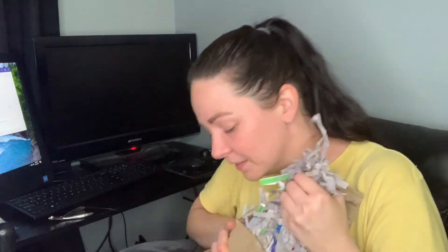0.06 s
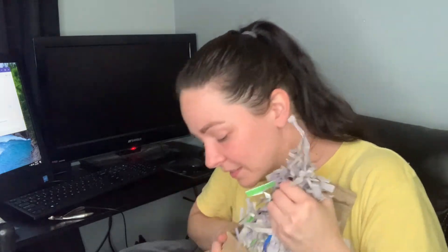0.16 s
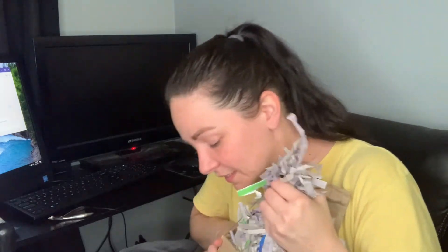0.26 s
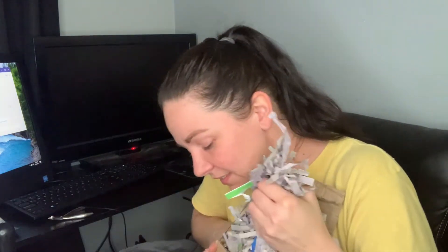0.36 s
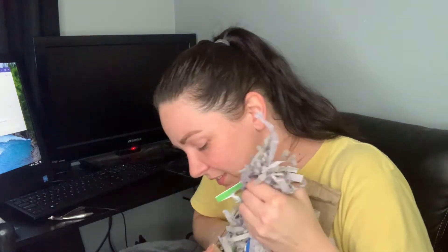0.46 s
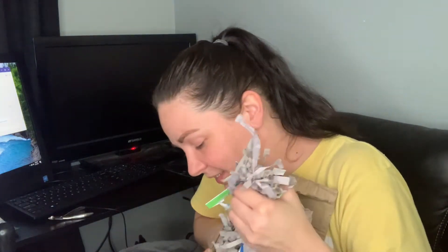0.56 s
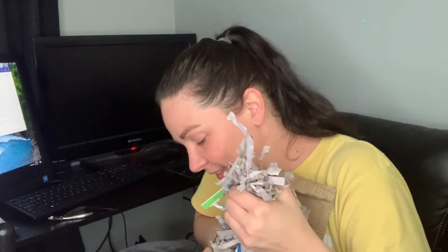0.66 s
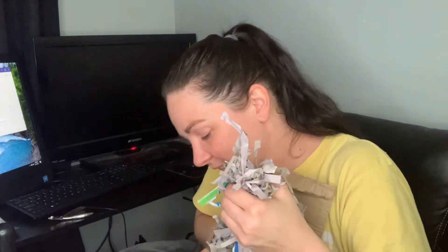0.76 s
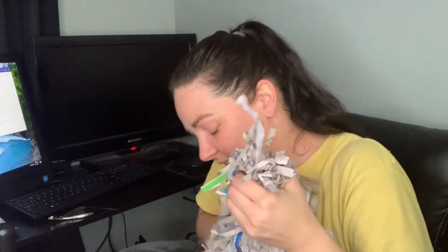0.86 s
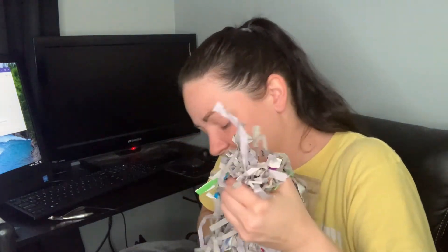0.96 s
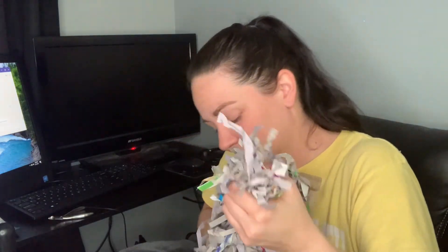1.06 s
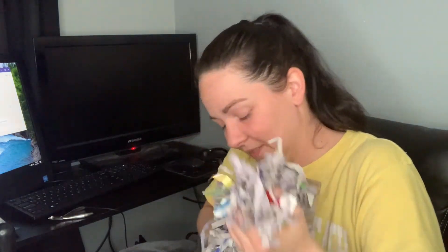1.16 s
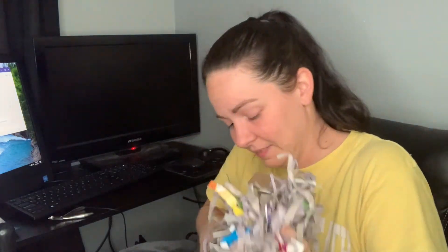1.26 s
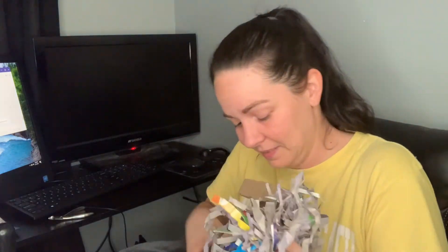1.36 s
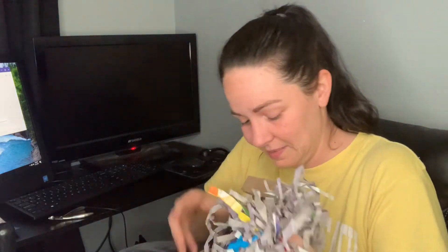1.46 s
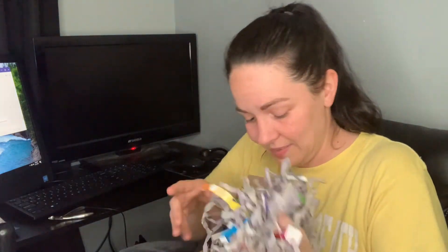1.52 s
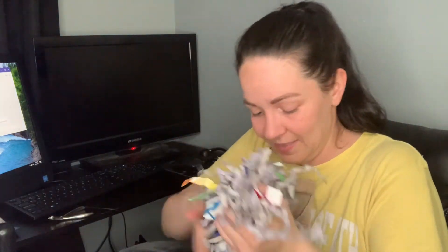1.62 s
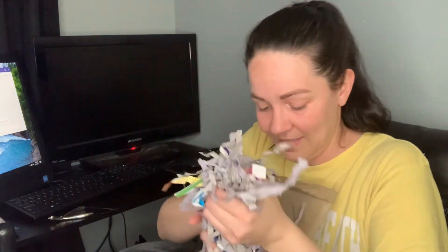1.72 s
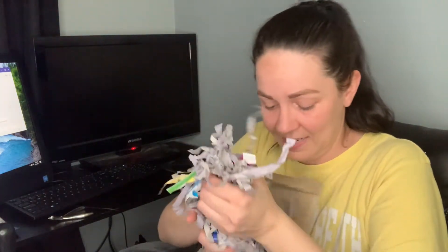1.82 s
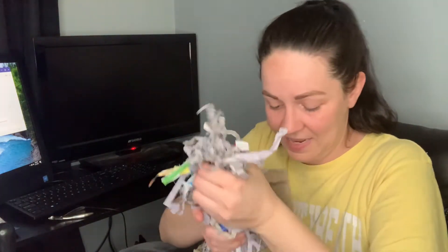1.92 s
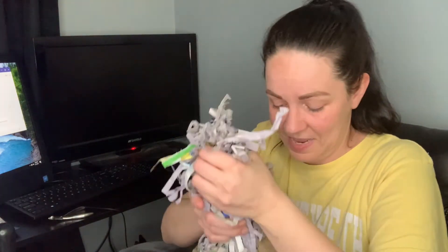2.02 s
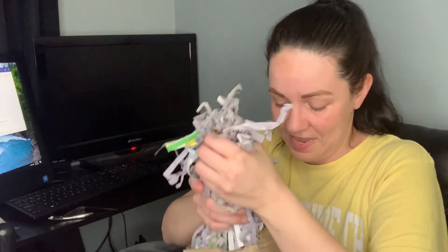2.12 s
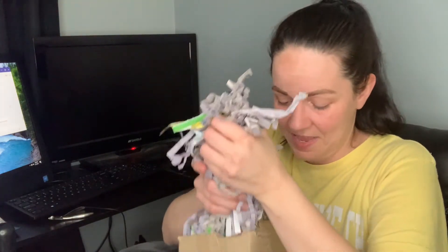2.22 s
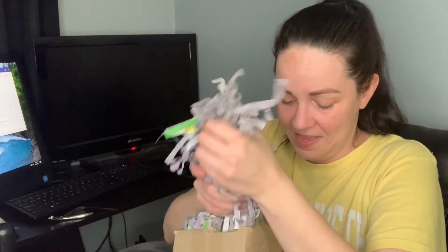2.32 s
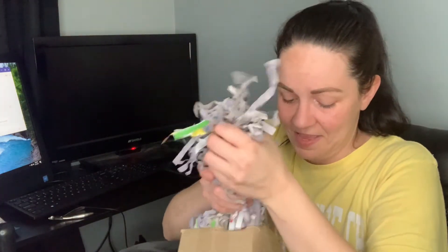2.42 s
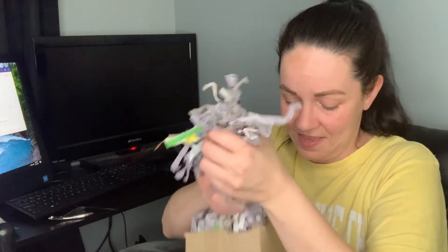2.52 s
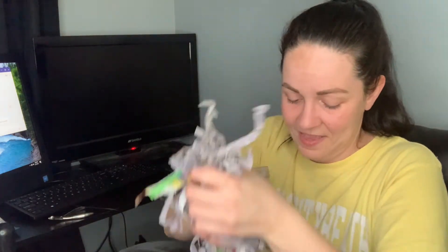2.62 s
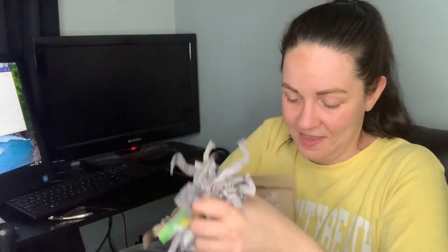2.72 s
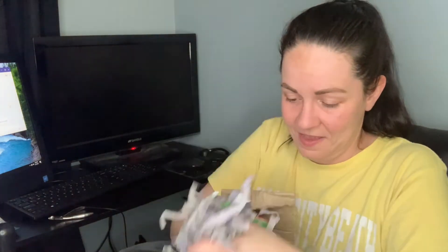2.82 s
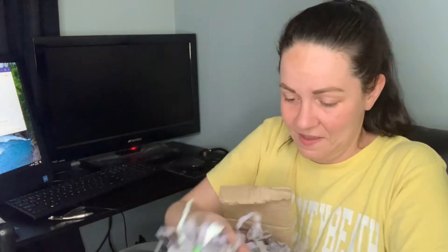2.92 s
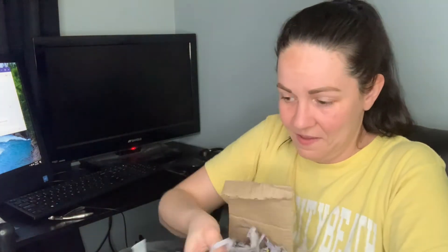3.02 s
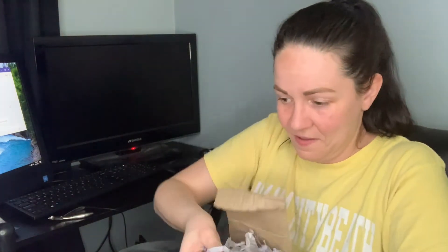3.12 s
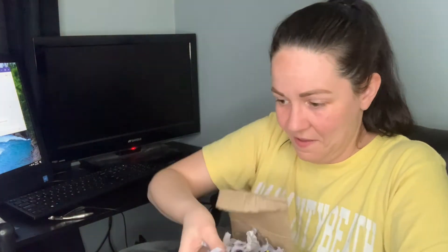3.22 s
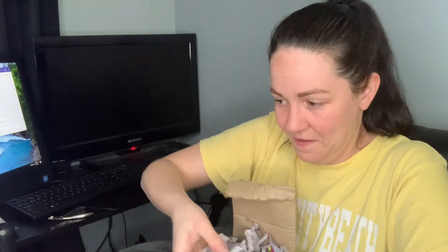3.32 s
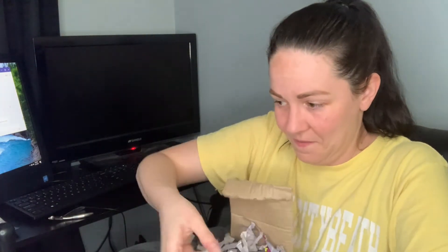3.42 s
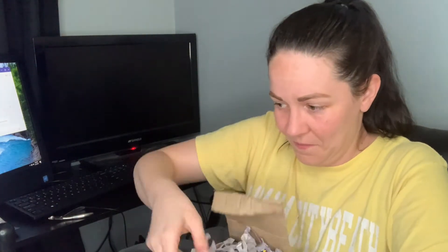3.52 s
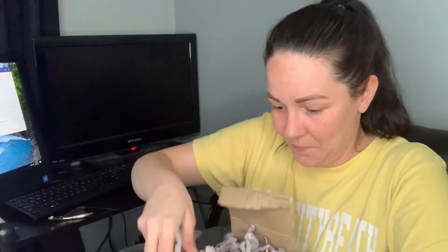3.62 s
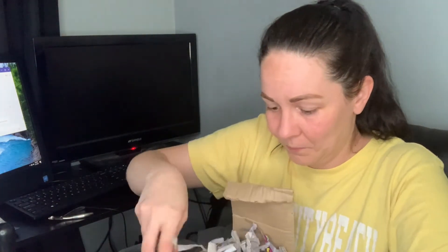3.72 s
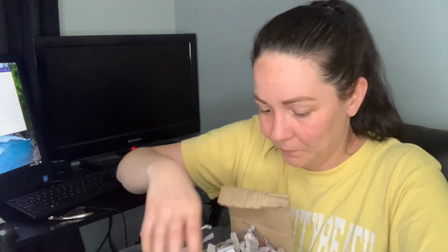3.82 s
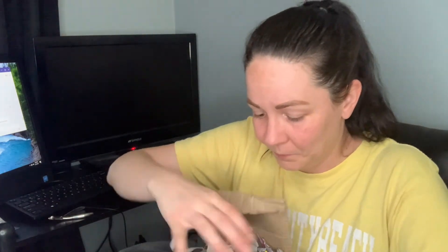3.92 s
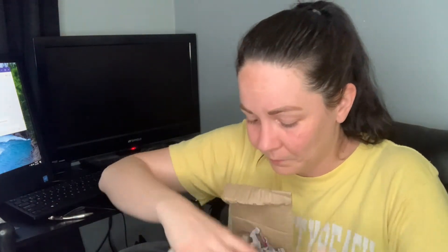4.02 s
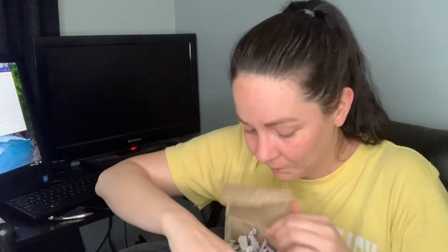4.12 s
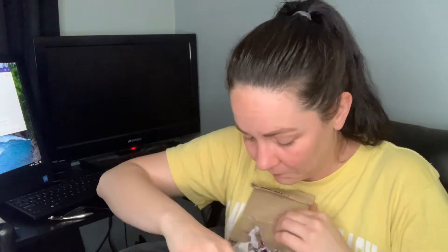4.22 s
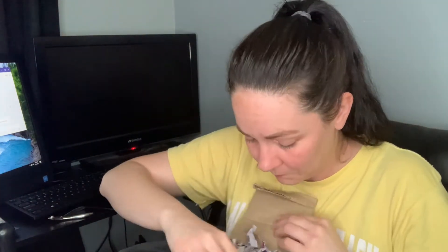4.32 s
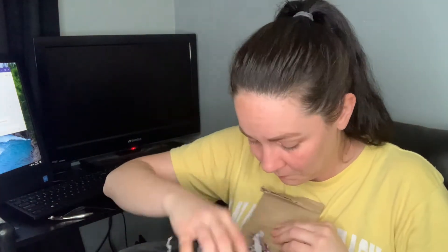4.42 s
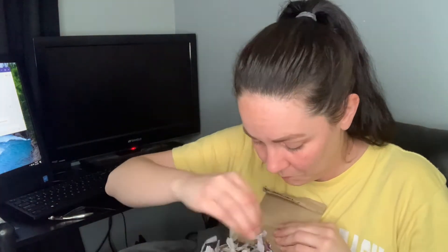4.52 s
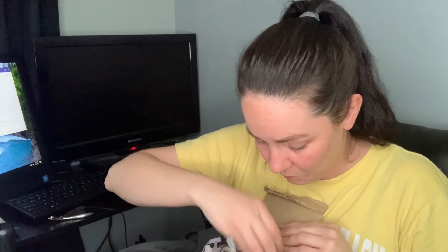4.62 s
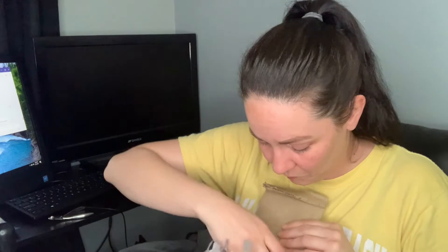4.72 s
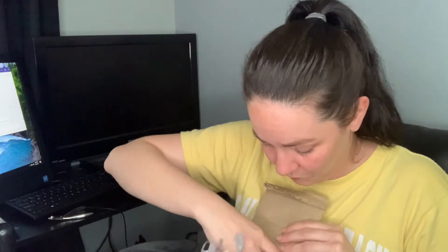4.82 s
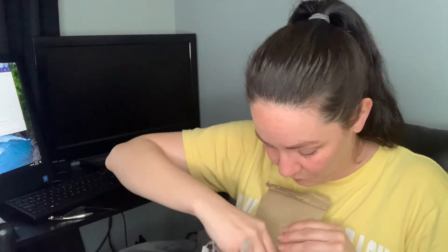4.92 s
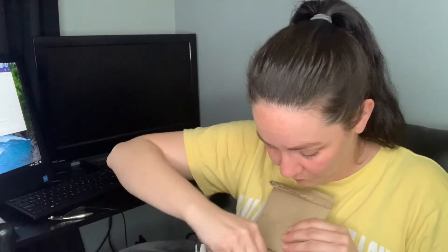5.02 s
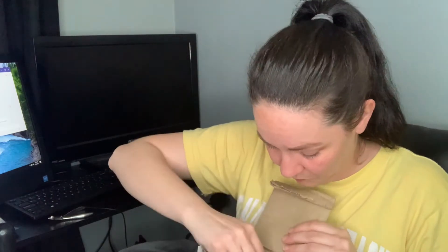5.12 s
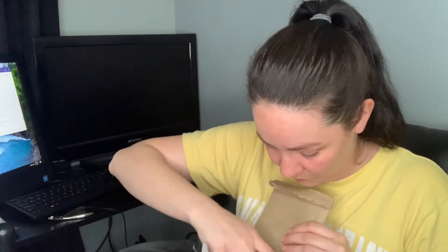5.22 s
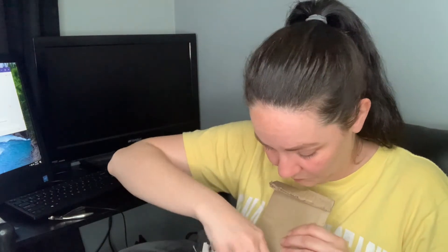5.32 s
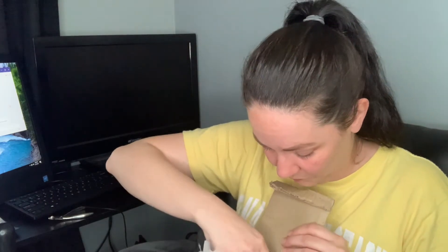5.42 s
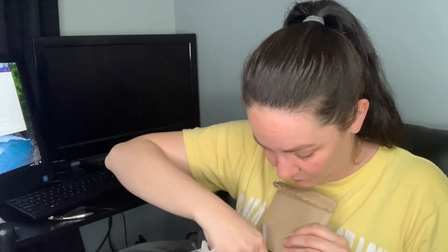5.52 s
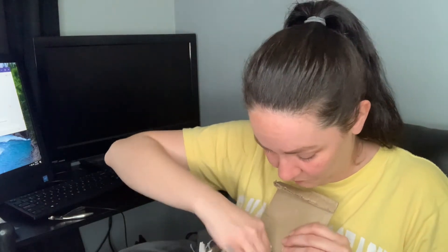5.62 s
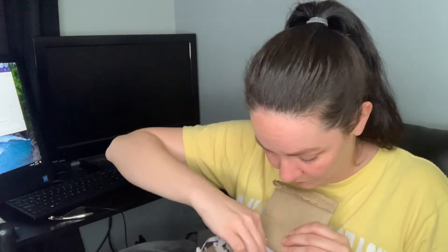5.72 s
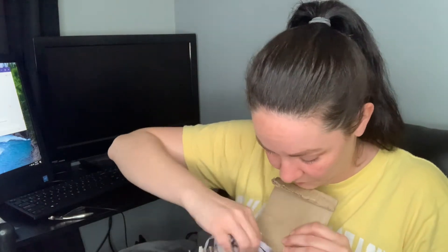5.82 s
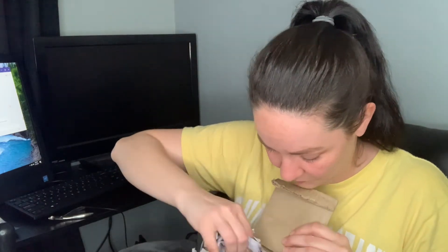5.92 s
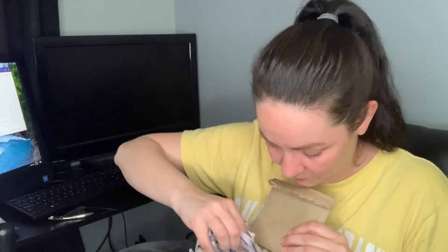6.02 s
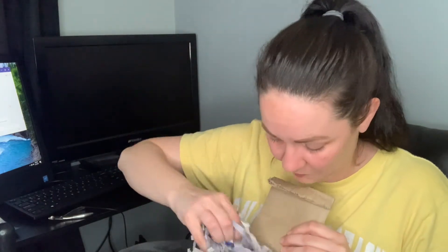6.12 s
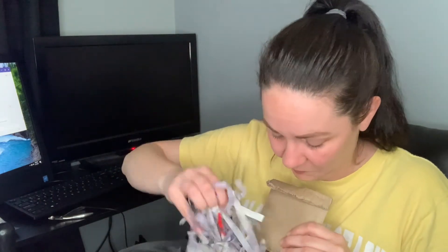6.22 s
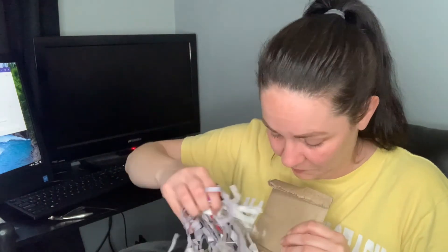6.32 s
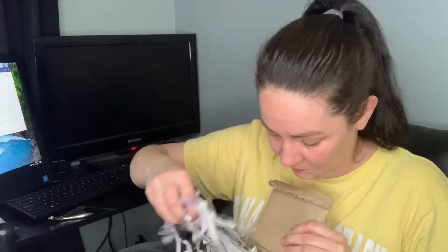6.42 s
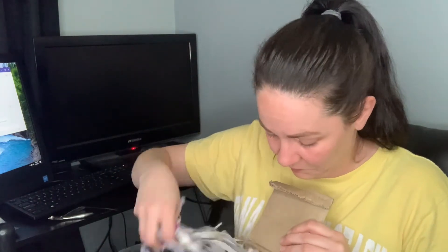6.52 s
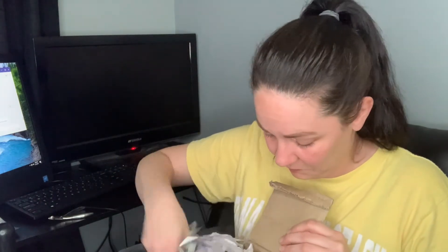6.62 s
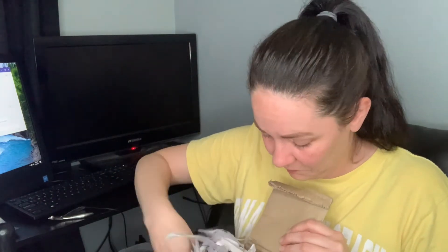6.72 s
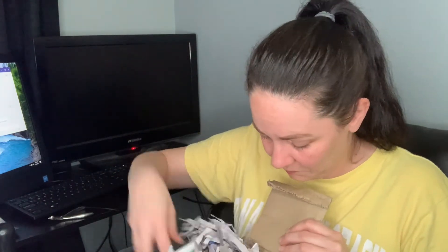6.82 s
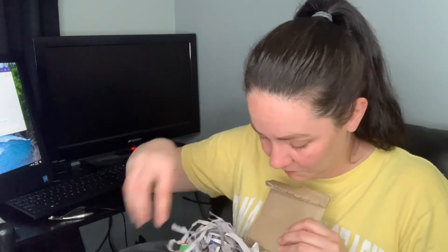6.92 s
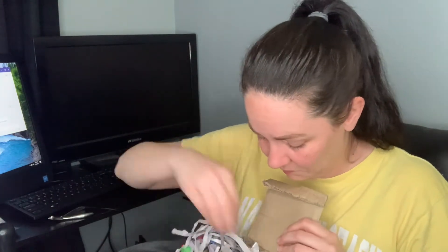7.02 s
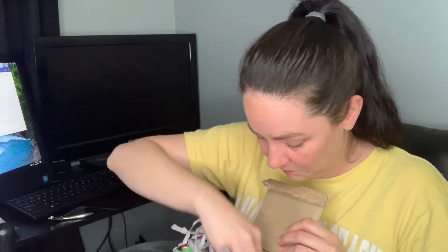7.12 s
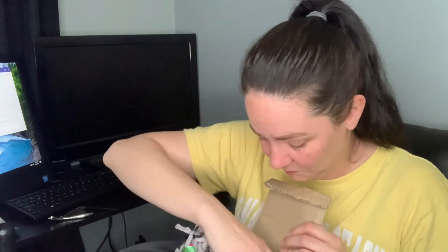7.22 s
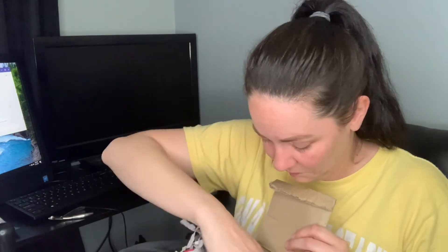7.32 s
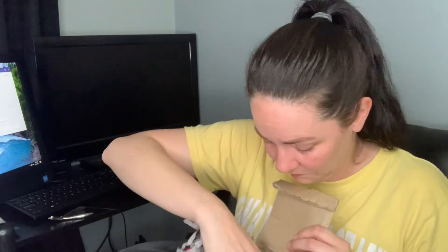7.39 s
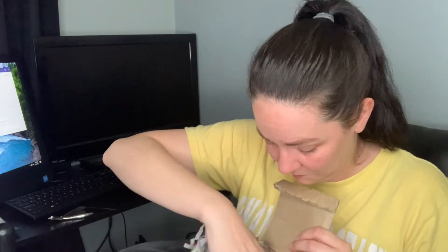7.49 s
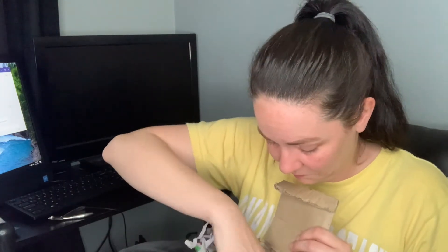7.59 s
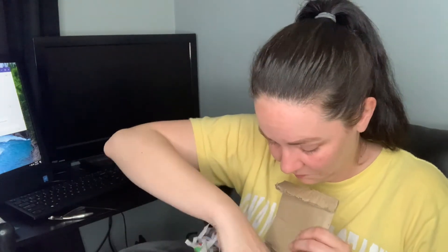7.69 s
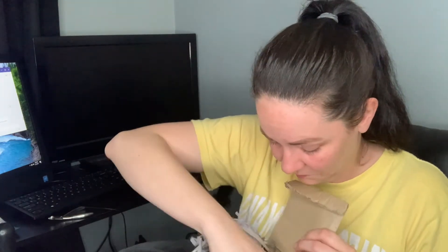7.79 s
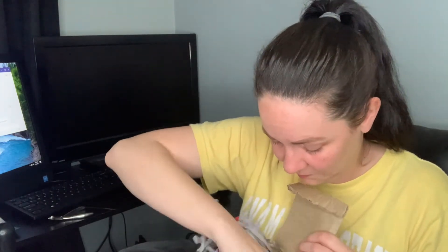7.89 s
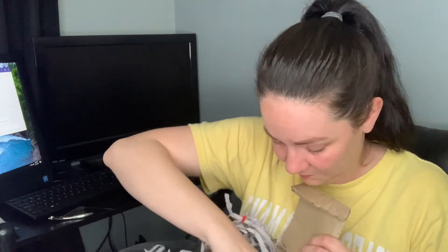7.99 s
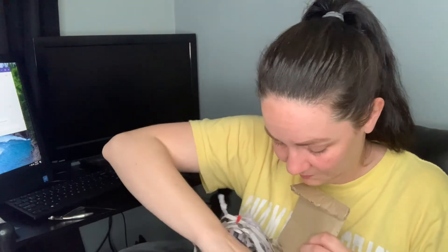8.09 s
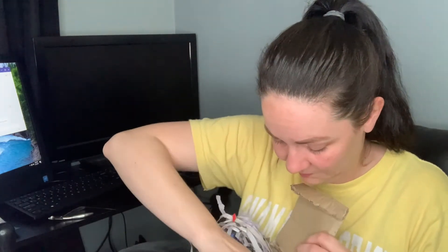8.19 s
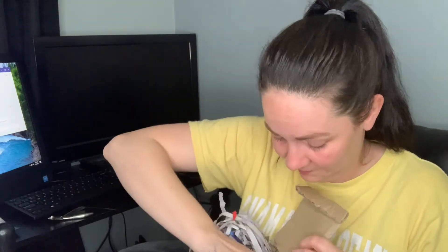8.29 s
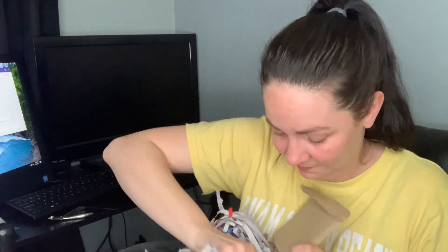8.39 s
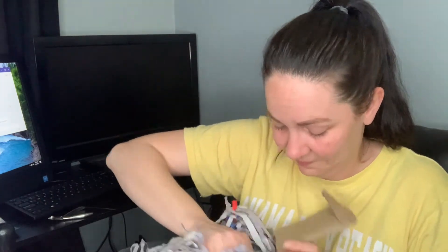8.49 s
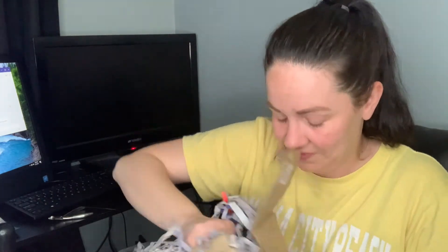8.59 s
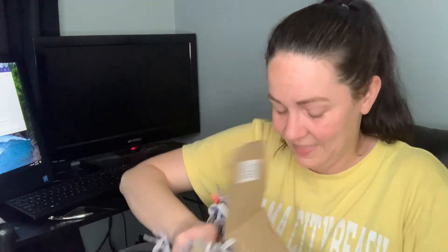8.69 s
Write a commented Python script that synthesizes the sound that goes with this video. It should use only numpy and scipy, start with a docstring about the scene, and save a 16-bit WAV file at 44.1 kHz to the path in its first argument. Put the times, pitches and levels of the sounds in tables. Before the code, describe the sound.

Hands dig through crisp shredded paper in a small cardboard box, with bright rustling, stiff paper crinkles, sharp snaps and dull box thuds indoors.

```python
"""Hands dig through shredded paper in a cardboard box, near a two-port microphone in a furnished room.
Strips hiss and tick from the start; the sharpest crease snaps near 0.48 s, the strongest stroke is near 0.81 s.
Strokes and box thuds go on to a lull near 3.8 s; a thud and kraft crinkles follow at 4.1 s, a dip near 4.5 s.
Crinkles crowd at 5.2-5.5 s, strong strokes come at 6-6.2 s, a hard thud near 7.4 s, then snaps to 8.5 s.
Friction is slips over shaped noise; snaps and crinkles are kicked resonances; thuds are decaying wall modes."""
import sys
import numpy as np
from scipy import signal
from scipy.fft import rfft, irfft, next_fast_len
from scipy.io import wavfile
from scipy.ndimage import uniform_filter1d, map_coordinates

SR = 44100
rng = np.random.default_rng(int(sys.argv[2]) if len(sys.argv) > 2 else 0)


def store_wav(level_fs):
    """Save 16-bit WAV to argv[1]."""
    pcm = np.round(np.clip(np.atleast_2d(level_fs), -1, 1) * 32767)
    wavfile.write(sys.argv[1], SR, pcm.T.astype(np.int16))


N = 385875


def amp(db):
    """Amplitude factor of a level in dB."""
    return 10 ** (np.asarray(db) / 20)


def unit(x):
    """x scaled to an RMS of 1 in each row."""
    return x / np.sqrt(np.mean(x ** 2, -1, keepdims=True) + 1e-20)


def along(points, hz):
    """Interpolate (Hz, value) points on a log frequency axis."""
    point_hz, value = np.transpose(points)
    return np.interp(np.log(hz + 1), np.log(point_hz + 1), value)


def curves(rows):
    """One value per sample for each column after the time."""
    time_s, *columns = np.transpose(rows)
    return [np.interp(np.arange(N) / SR, time_s, column) for column in columns]


def wobble(knots_per_s):
    """A smooth random curve."""
    knots = rng.standard_normal(int(N * knots_per_s / SR) + 4)
    return map_coordinates(knots, [np.arange(N) * knots_per_s / SR])


def filtered(x, response):
    """x times a complex response of frequency."""
    size = next_fast_len(N + SR // 2)
    spectrum = rfft(x, size) * response(np.fft.rfftfreq(size, 1 / SR))
    return irfft(spectrum, size)[..., :N]


def resonances(peaks, hz):
    """Sum of (centre Hz, width Hz, dB) resonances of alternating sign."""
    total = 0
    for k, (centre, width, db) in enumerate(peaks):
        damping = 1j * hz * width
        total = total + (-1) ** k * amp(db) * damping / (centre ** 2 - hz ** 2 + damping)
    return total


# Room air noise colour. Each row: frequency in Hz, level in relative dB.
AIR_COLOUR = [(20, -23), (60, 3.5), (300, -2.5), (700, -32), (3000, -43), (15500, -28)]


def air():
    """Steady noise with most of its level in the lows, independent in the two rows."""
    noise = rng.standard_normal((2, N))
    return amp(-70.5) * unit(filtered(noise, lambda hz: amp(along(AIR_COLOUR, hz))))


# Room decay. Each row: frequency in Hz, t60 in s.
ROOM_T60 = [(150, 0.37), (1500, 0.35), (12000, 0.16)]


def room(hits):
    """Convolve with a noise tail in which each frequency dies at its own speed."""
    hz, t, z = signal.stft(rng.standard_normal((2, SR // 2)), SR, nperseg=256)
    decay = amp(-60 * t / along(ROOM_T60, hz)[:, None])
    tail = signal.istft(z * decay, SR, nperseg=256)[1]
    tail = tail / np.linalg.norm(tail[0])
    delayed = np.pad(hits, (130, 0))[None]  # samples
    return signal.fftconvolve(delayed, tail, axes=1)[:, :N]


# Port phase. Each row: frequency in Hz, lead of left over right in radians.
PORT_LEAD = [(0, 0), (600, -.9), (1200, -.9), (2600, -2.1), (3400, -1.9), (4400, -3.3), (6200, -4.8),
             (8300, -3.2), (9600, -3.1), (13200, -.05), (14800, .05), (15700, .8)]
# Stereo likeness of left and right by frequency. Each row: frequency in Hz, likeness (no unit).
STEREO_LIKENESS = [(60, .8), (300, .8), (700, .2), (1400, .7), (2000, .55), (3600, .28), (5000, .55),
                   (7300, .65), (8300, .98), (9600, .98), (10400, .85), (12400, .84), (13400, .98),
                   (14700, .98), (15800, .7)]
# Port balance. Each row: frequency in Hz, left minus right in dB.
PORT_BALANCE = [(60, -1), (150, 0), (380, 0.5), (950, -3.5), (2380, -1.5), (5980, -1), (15000, 0.5)]


def ports(pair):
    """The direct row reaches both ports with a phase offset; the scattered row differs in sign between them."""
    def mix(hz):
        turn = np.arccos(np.clip(along(STEREO_LIKENESS, hz), 0, 1)) / 2
        return np.array([np.cos(turn), np.sin(turn)])

    def offset(hz):
        side = np.array([[.5], [-.5]])  # left, right
        phase = side * np.interp(hz, *np.transpose(PORT_LEAD))
        return amp(side * along(PORT_BALANCE, hz)) * np.exp(1j * phase)

    direct, scattered = filtered(pair, mix)
    return filtered(np.array([direct + scattered, direct - scattered]), offset)


# Blows on the box.
# Each row: start in s, wall drive in relative dB, most driven pitch in Hz, deep drive in relative dB.
THUDS = [(0, -40, 294, -43.5), (0.203, -27.5, 434, -73), (0.248, -41, 269, -42), (0.751, -36, 357, -76),
         (0.795, -33, 444, -69), (1.063, -29.5, 370, -53), (1.289, -37, 356, -51), (1.56, -37, 310, -64),
         (1.629, -26.5, 287, -47), (2.156, -33.5, 454, -75.5), (2.353, -35.5, 420, -76.5),
         (2.561, -39, 285, -39.5), (2.694, -32.5, 380, -44), (2.62, -42.5, 250, -46.5),
         (2.743, -34, 266, -55), (3.783, -44, 298, -68), (3.866, -51, 237, -53.5), (3.916, -44, 202, -52),
         (4.097, -24, 274, -42.5), (4.64, -28.5, 320, -47), (4.941, -47, 372, -69), (5.136, -34, 211, -61),
         (5.186, -30, 285, -56), (5.488, -43, 212, -60.5), (6.65, -32, 254, -38.5), (7.036, -36, 290, -70),
         (7.094, -33, 315, -55), (7.365, -21.5, 340, -43.5), (7.694, -35, 295, -65), (8.452, -35, 408, -82)]
# Modes of the box walls. Each row: frequency in Hz, level in relative dB, t60 in s.
BOX_MODES = [(50.6, -5, 0.18), (63.7, -4.5, 0.28), (88.7, 0, 0.15), (103.5, -2, 0.14), (134, 3, 0.14),
             (169.3, -1, 0.17), (206, 1.5, 0.054), (255, 1, 0.064), (298.6, 5, 0.051), (375, 2.5, 0.055),
             (436, 5.5, 0.082), (490, 0, 0.058), (578, 7.5, 0.053)]


def thuds():
    """A soft blow rings wall modes near its own pitch, and the deep modes in which the whole box rocks."""
    out, t = np.zeros(N + SR), np.arange(SR // 2)[:, None] / SR
    hz, mode_db, t60_s = np.transpose(BOX_MODES)
    rise = 1 - np.exp(-t * hz / 1.1)  # builds up over about one cycle
    for start_s, wall_db, centre_hz, deep_db in THUDS:
        wall_reach = amp(wall_db - 11 - 35.0 * np.log2(hz / centre_hz) ** 2)
        deep_reach = amp(deep_db + 3.5 - 2.47 * np.log2(hz / 90) ** 2)
        scatter_db = rng.normal(0, 3.25, len(hz))
        strength = (wall_reach + deep_reach) * amp(mode_db + scatter_db - 60 * t / t60_s)
        ring = strength * rise * np.sin(2 * np.pi * (hz * t + rng.random(len(hz))))
        out[round((start_s + .004) * SR):][:len(t)] += ring.sum(1)
    return out[:N]


def buckles(events, width, rattle, order=2):
    """Each fold lets go at once: a kick and a dying rattle through a steep, broad resonance of the sheet."""
    out, t = np.zeros(N + SR), np.arange(4096) / SR
    f = np.fft.rfftfreq(len(t), 1 / SR)
    for start_s, peak_db, hz, t60_s in events:
        burst = rattle * amp(-60 * t / max(t60_s, .002)) * rng.standard_normal(len(t))
        burst[0] += 1  # kick
        sheet = resonances([(hz, width * hz, 0)], f) ** order
        ring = irfft(rfft(burst) * sheet)
        out[round((start_s + .0007) * SR):][:len(t)] += amp(peak_db) * ring / np.abs(ring).max()
    return out[:N]


# Kraft paper buckling. Each row: start in s, fold peak in dB, fold centre in Hz, rattle t60 in s,
# crack peak in dB.
CRINKLES = [(0.093, -44, 1300, .03, -44), (0.2487, -44, 1300, 0.027, -23.5),
            (0.291, -30.5, 1120, 0.031, -31), (0.4777, -21.5, 1820, 0.015, -19),
            (0.699, -37.5, 1450, .04, -35), (0.798, -36, 2200, 0.027, -33), (1.071, -33.5, 1340, .035, -37),
            (1.159, -33, 1630, 0.042, -40.5), (1.626, -37, 865, 0.031, -36), (2.163, -37, 1390, 0.057, -41),
            (2.562, -40, 1300, 0.063, -35), (2.695, -36.5, 960, 0.1, -32), (2.98, -29, 2000, 0.013, -36),
            (3.867, -49, 1500, .03, -41), (3.917, -45, 2380, .035, -38), (4.097, -27, 1400, 0.054, -21),
            (4.1, -23, 574, 0.042, -33), (4.599, -59, 1500, .03, -46), (4.646, -23.5, 1190, 0.042, -23),
            (4.678, -39, 1490, 0.018, -37), (4.739, -35, 1300, 0.17, -41), (4.852, -37, 1294, .06, -49),
            (4.941, -23.5, 1400, 0.0084, -40), (5.0053, -25, 1970, 0.011, -23),
            (5.196, -32, 1100, 0.05, -43.5), (5.205, -24.5, 1060, 0.021, -43),
            (5.212, -31.5, 840, 0.044, -46), (5.232, -42, 1300, 0.033, -46), (5.29, -33, 1000, 0.25, -50),
            (5.31, -28.5, 1420, 0.054, -37), (5.324, -31, 1300, 0.049, -36), (5.339, -31, 1420, 0.04, -44),
            (5.355, -38, 1500, .04, -46), (5.391, -37, 1180, 0.12, -47), (5.47, -39, 1500, 0.043, -46),
            (5.4938, -30.5, 1380, 0.02, -44), (5.51, -44, 1450, .06, -48), (5.9547, -39.5, 1100, 0.03, -37),
            (6.221, -30, 1150, 0.034, -36.5), (6.276, -28, 910, 0.022, -25),
            (7.043, -29.5, 2460, 0.073, -30), (7.098, -28.5, 1240, 0.089, -40),
            (7.105, -21.5, 944, 0.041, -31), (7.3619, -19, 1260, 0.016, -20), (7.513, -41, 2500, .015, -42),
            (7.671, -42, 1200, .04, -42), (7.696, -37.5, 1000, 0.13, -42), (8.347, -41, 1300, 0.028, -34),
            (8.455, -35.5, 1070, 0.036, -43)]


def folds():
    """The body of each crinkle: a kraft fold buckles at its own pitch."""
    events = [(s, peak_db, hz, t60_s) for s, peak_db, hz, t60_s, _ in CRINKLES]
    return buckles(events, width=0.93, rattle=0.3, order=3)


def cracks():
    """The crack of each crinkle: a short burst through a very wide resonance."""
    events = [(s, crack_db, 2400, .018) for s, _, _, _, crack_db in CRINKLES]
    return buckles(events, width=4.0, rattle=1.0)


# Creases snapping in the strips. Each row: start in s, peak in dB, centre in Hz, rattle t60 in s.
SNAPS = [(0.224, -27, 12500, .006), (0.3431, -24, 12700, .006), (0.4774, -3.5, 6000, .003),
         (0.4784, -21, 10800, .004), (0.699, -26, 12000, .015), (1.416, -40, 12500, .015),
         (1.8795, -23, 12800, .008), (2.1635, -29, 13000, .008), (3.9151, -32, 9500, .03),
         (4.0962, -19, 12580, .03), (4.4675, -44, 11000, .015), (4.5284, -43, 6800, .03),
         (4.5985, -36, 11000, .012), (5.006, -12.5, 11500, .006), (5.4985, -26, 12720, .008),
         (5.9524, -29, 9000, .02), (6.1695, -14, 11500, .008), (7.0415, -36, 4850, .03),
         (7.363, -24, 11000, .04), (7.61, -31, 10000, .02), (7.772, -29, 10000, .008),
         (7.8942, -21, 12000, .008), (7.948, -20, 11000, .006), (8.481, -19, 12000, .008)]


def snaps():
    """Single creases let go as short, mostly bright resonant bursts."""
    return buckles(SNAPS, width=0.94, rattle=0.56, order=3)


def friction(response, per_s, spread_db, clump_db, hiss, patchy_db):
    """Tiny slips of random size over sliding hiss; row 0 direct, row 1 scattered by the heap."""
    slips = rng.random((2, N)) < per_s / SR
    size_db = spread_db * np.minimum(rng.exponential(size=(2, N)), 3.2)
    sizes = amp(size_db) * rng.standard_normal((2, N))
    rub = np.sqrt(1 - hiss) * unit(slips * sizes) + np.sqrt(hiss) * rng.standard_normal((2, N))
    # different strips take turns: patches of gain in time and frequency
    z = signal.stft(rub * amp(clump_db * wobble(40)), nperseg=512)[2]
    field = uniform_filter1d(rng.standard_normal(z.shape[1:]), size=6, axis=0)
    field = uniform_filter1d(field, size=4, axis=1)
    rub = signal.istft(z * amp(patchy_db * field / field.std()), nperseg=512)[1][:, :N]
    return unit(filtered(rub, response))


# Box wall colour. Each row: frequency in Hz, level in relative dB per Hz.
WALL_COLOUR = [(20, -41), (45, -4.5), (100, -5.5), (300, 1.5), (450, 3), (700, -7), (1500, -11.5)]


def wall_scrape(level_db):
    """Sparse slips and hiss rub the box walls, which ring in their modes."""
    # width in Hz of a mode from its t60
    modes = [(hz, np.log(1000) / np.pi / t60_s, db) for hz, db, t60_s in BOX_MODES]

    def tone(hz):
        return amp(along(WALL_COLOUR, hz)) * (1 + 1.03 * np.abs(resonances(modes, hz)))

    return amp(level_db) * friction(tone, per_s=250, spread_db=1.0, clump_db=-1.84, hiss=0.8, patchy_db=3.0)


# Kraft paper colour. Each row: frequency in Hz, level in relative dB per Hz.
KRAFT_COLOUR = [(300, -50), (600, 0.5), (850, -2.5), (1400, 1.5), (2000, -7), (3500, -16.5), (7000, -13)]
# Modes of the hollow kraft bag. Each row: frequency in Hz, width in Hz, level in relative dB.
BAG_MODES = [(828, 11, 3), (1135, 120, -3.5), (1540, 20, 3.5), (2077, 25, 10)]


def kraft_rub(level_db):
    """Slips and hiss rub the kraft bag, which rings in its hollow modes."""
    def tone(hz):
        return amp(along(KRAFT_COLOUR, hz)) * (1 + 0.79 * np.abs(resonances(BAG_MODES, hz)))

    return amp(level_db) * friction(tone, per_s=900, spread_db=2.5, clump_db=1.97, hiss=0.61, patchy_db=1.5)


# Strip colour. Each row: frequency in Hz, level in relative dB per Hz.
STRIP_COLOUR = [(800, -56), (1800, -1), (2600, -1.5), (3900, -1.5), (4800, 1), (6200, -6.5), (9000, -14),
                (15500, -9)]


def strip_rustle(level_db):
    """Dense slips and hiss of strips sliding over each other, strongest in the mid band."""
    def tone(hz):
        return amp(along(STRIP_COLOUR, hz))

    return amp(level_db) * friction(tone, per_s=2500, spread_db=1.0, clump_db=1.5, hiss=0.57, patchy_db=2.5)


# Cut edge colour. Each row: frequency in Hz, level in relative dB per Hz.
EDGE_COLOUR = [(3000, -66), (5500, -5), (7500, 0.5), (10000, 1.5), (14500, -2.5), (15900, -2.5)]


def edge_tone(hz):
    """Bright response of the cut edges."""
    return amp(along(EDGE_COLOUR, hz))


def edge_fizz(level_db):
    """Very dense slips and hiss of the cut edges make a fine fizz."""
    rub = friction(edge_tone, per_s=5000, spread_db=-0.5, clump_db=1.5, hiss=0.43, patchy_db=3.0)
    return amp(level_db) * rub


def strip_ticks(level_db):
    """Single strips flick free: sparse slips without hiss."""
    rub = friction(edge_tone, per_s=120, spread_db=1.2, clump_db=1.5, hiss=0, patchy_db=3.0)
    return amp(level_db) * rub


# Strokes of the hands.
# Each row: peak time in s, level in dB, nominal time in s to rise 10 dB, nominal time in s to fall 10 dB.
STROKES = [(.13, -48.5, .1, 0.33), (.25, -48, 0.12, 0.23), (.48, -45, 0.38, 0.063),
           (0.586, -42.5, 0.03, 0.07), (.66, -49, 0.15, .015), (.703, -45, .004, .03),
           (0.812, -34, 0.06, 0.0559), (.9, -46.5, .02, 0.31), (1.262, -42, 0.22, 0.06),
           (1.44, -61.5, .03, 0.8), (1.53, -52.5, 0.04, 0.27), (1.65, -42.5, .07, 0.07),
           (1.8, -42.5, 0.07, 0.12), (2.05, -47, 0.26, 0.29), (2.18, -49, .02, 0.2),
           (2.33, -43.5, 0.02, 0.11), (2.581, -40.5, 0.05, 0.04), (2.7, -41, 0.08, 0.05),
           (2.95, -42, 0.2, 0.12), (3.219, -40.5, 0.05, 0.26), (3.45, -45, 0.1, 0.08), (3.7, -54, 0.3, 0.2),
           (3.872, -57, .006, .12), (3.922, -51, 0.006, 0.07), (4.012, -47, 0.035, 0.14),
           (4.11, -45.5, 0.02, 0.18), (4.21, -47.5, 0.04, 0.09), (4.33, -48, 0.1, 0.082),
           (4.535, -67, .05, .045), (4.602, -55, .005, .05), (4.642, -42, 0.022, 0.35),
           (4.96, -38, 0.0264, 0.08), (5.205, -45.5, 0.079, 0.06), (5.33, -48, 0.12, 0.45),
           (5.82, -46.5, 0.15, 0.1), (6.001, -40.5, 0.03, 0.07), (6.12, -39, 0.0243, 0.0847),
           (6.171, -34.5, 0.045, 0.0757), (6.37, -44, 0.24, 0.01), (6.58, -42.5, 0.31, 0.18),
           (6.9, -57.5, 0.6, 1), (7.11, -50.5, 0.02, 0.15), (7.2, -44, 0.08, 0.09), (7.38, -51, 0.14, 0.13),
           (7.6, -52.5, .3, 0.27), (7.76, -46.5, 0.09, 0.07), (7.93, -47, .1, 0.06),
           (8.02, -49, 0.07, 0.25), (8.34, -46, 0.16, 0.13), (8.415, -50, .01, .03),
           (8.46, -42, 0.02, 0.06), (8.58, -53, 0.4, 1), (8.75, -47, 0.13, 0.089)]
ROUND_DB = 2  # depth over which a stroke's top is rounded
SETTLE_DB = 14  # further under the peak the slope doubles


def strokes():
    """Digging level in dB: each stroke swells to its peak and dies away; overlapping strokes add in power."""
    t = np.arange(0, N, step=32) / SR
    peak_s, level_db, rise_s, fall_s = np.transpose(STROKES)[:, :, None]
    down_db = 10 * np.where(t < peak_s, (peak_s - t) / rise_s, (t - peak_s) / fall_s)
    down_db = np.hypot(down_db, ROUND_DB) - ROUND_DB
    down_db = down_db + np.maximum(down_db - SETTLE_DB, 0)
    power = amp(2 * (level_db - down_db)).sum(0)
    tremble_db = 0.94 * wobble(22)  # the grip trembles a little
    return np.interp(np.arange(N) / SR, t, 10 * np.log10(power)) + tremble_db


# Levels relative to the strokes as the hands move about the box.
# Each row: time in s, kraft bag in dB, box walls in dB, mid-band rustle in dB before a trim.
CONTACT = [(0, 0, 10.5, -19), (.15, -2.5, -6.5, -1), (.6, -5, -8, 1.5), (1.2, -2.5, -7, 1),
           (2, -5, -8.5, 0.5), (2.9, -5, -10, 0.5), (3.5, -4, -10.5, 1.5), (3.65, -11, -19, -4),
           (3.83, -3, -2, -0.5), (3.95, -7, -10, -1.5), (4.3, -6.5, -13, -1.5), (4.8, -4, -7.5, -1),
           (5.1, -5.5, -10, 0.5), (5.4, -1.5, -6.5, -2), (5.6, 0, -8, 0.5), (6.05, -3, -10, -4),
           (6.5, -10.5, -10.5, 0.5), (7, -2, -7.5, 1), (7.3, -2, -3.5, -1.5), (8, -2, -6.5, 0),
           (8.75, -9, -9.5, -2.5)]


def digging():
    """Strips, bag and walls rub as the hands move; in harder digging the fizz grows faster than the rustle."""
    stroke_db = strokes()
    kraft_db, walls_db, mid_db = curves(CONTACT)
    rustle_db = stroke_db + mid_db - 1.5 - 0.092 * (stroke_db + 40.0)
    paper = edge_fizz(stroke_db + 3.0) + strip_rustle(rustle_db) + strip_ticks(stroke_db - 11)
    return paper + kraft_rub(stroke_db + kraft_db) + wall_scrape(stroke_db + walls_db)


def scene():
    """Digging and air reach the ports as they are; the hits arrive direct and through the room."""
    hits = thuds() + folds() + cracks() + snaps()
    direct_hits = hits * np.array([[1], [0]])
    return ports(air() + amp(-9.5) * room(hits) + direct_hits + digging())


TOP_HZ = 15900


def record(dry):
    """The recorder keeps nothing above its band limit."""
    return filtered(dry, lambda hz: hz < TOP_HZ)


dry = scene()
out = record(dry)
store_wav(out)
```